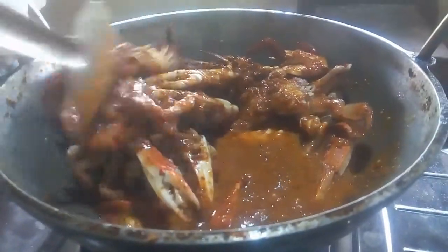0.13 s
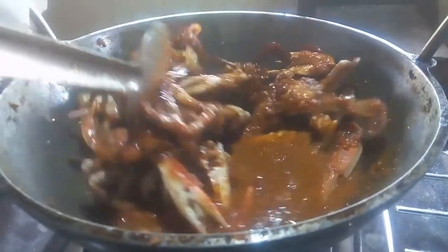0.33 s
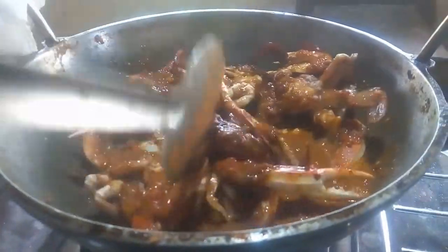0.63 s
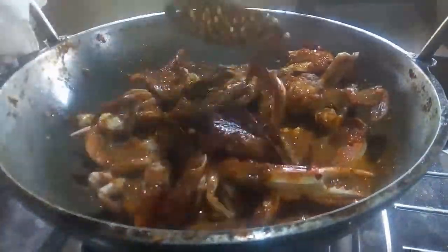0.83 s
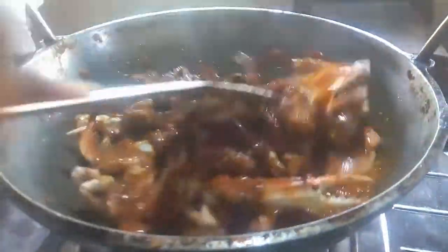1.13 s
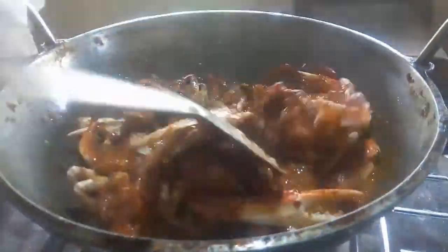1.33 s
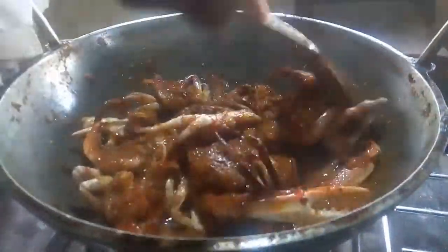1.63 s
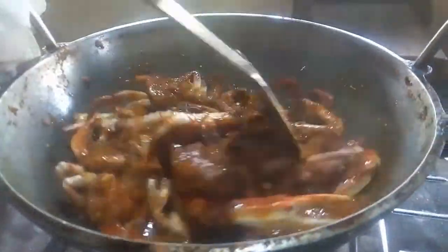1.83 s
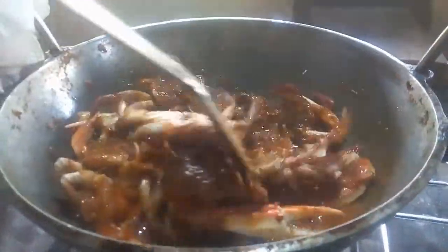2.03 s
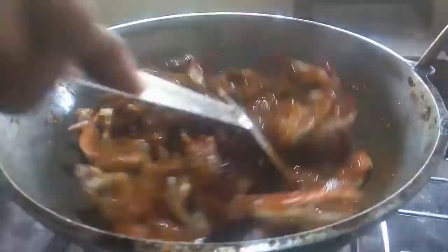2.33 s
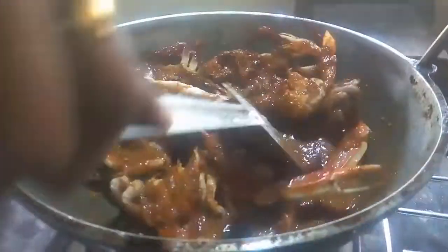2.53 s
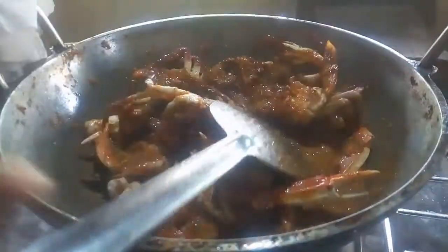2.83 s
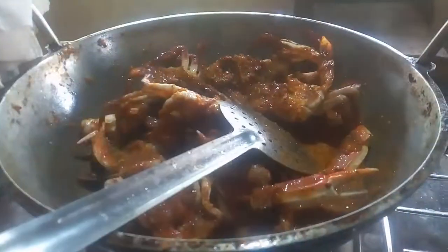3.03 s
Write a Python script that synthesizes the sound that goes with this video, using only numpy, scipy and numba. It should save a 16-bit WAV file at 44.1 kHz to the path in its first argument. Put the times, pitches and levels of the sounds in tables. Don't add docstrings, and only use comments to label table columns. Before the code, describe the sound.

A metal skimmer stirs crab in thick gravy, close up in a small kitchen. Gritty scrapes, sharp shell ticks and squelches crowd 0-0.8 s, with a bright clink near 0.26. Wet strokes and clicks continue from 1.0 to 2.1, with knocks near 1.7 and 1.9. A firm scrape and wet thud land around 2.3, then it quietens until the handle clatters on the rim at 2.92, bounces rapidly and rings.

```python
import sys
import numpy as np
from scipy import signal
from scipy.fft import rfft, irfft
from scipy.io import wavfile
from scipy.ndimage import uniform_filter1d
from numba import njit

SR = 44100
rng = np.random.default_rng(int(sys.argv[2]) if len(sys.argv) > 2 else 0)


def master_out(mix):
    frames = np.transpose(np.atleast_2d(mix))
    ceiling = np.clip(frames, -1, 1)
    pcm = np.round(ceiling * 32767).astype(np.int16)
    wavfile.write(sys.argv[1], SR, pcm)


def invert_db(x):
    u = np.asarray(x, float) / 20
    return 10 ** u


N = 141120

# (level [dB], time to fade by 60 dB [s])
SKIMMER = [(-5.5, 0.22), (0.5, 0.19), (-8, 0.25), (-8, 0.18), (-1, 0.14), (2, 0.14), (5.5, 0.086),
           (6, 0.11), (2.5, 0.17), (7, 0.26), (4, 0.36), (8, 0.11), (-1.5, 0.05), (13.5, 0.098)]
# (level [dB], time to fade by 60 dB [s])
PAN = [(-9, 0.31), (-10, 0.34), (-0.5, 0.22), (-4, .22), (5.5, 0.057), (-25, .2), (8.5, 0.055),
       (13.5, 0.083), (11, 0.089), (11.5, 0.12), (15.5, 0.051), (-1.5, 0.076), (-8, .2), (-9, 0.074)]


def colour(table, hz):
    points = np.array(table, float)
    return np.interp(np.log(np.maximum(hz, 1)), np.log(points[:, 0]), points[:, 1])


def walk(rate):
    hold = int(SR / rate)
    steps = np.repeat(rng.standard_normal(N // hold + 1), hold)
    level = uniform_filter1d(steps, hold)[:N]
    return level / level.std()


@njit
def add(out, start, n, pole, glide, rise, left, right):
    for k in range(len(start)):
        z, p, unrisen = 1. + 0j, pole[k], 1.
        for i in range(start[k], min(start[k] + n[k], out.shape[1])):
            unrisen *= rise[k]
            out[0, i] += (1 - unrisen) * (z * left[k]).imag
            out[1, i] += (1 - unrisen) * (z * right[k]).imag
            z *= p
            p *= glide[k]


def rings(s, hz, db, t60, luck, glide=0., stop_s=9.):
    # (pitch [Hz], level [dB])
    right_port = [(200, 0), (600, -.5), (1400, -4.5), (2800, -5.5), (5500, -2), (9000, -9), (16000, -7)]
    alike_below_hz, rise_cycles = 3000, .6
    t60 = np.maximum(t60, 1e-4)
    s, hz, db, t60, luck, stop_s = (a.ravel() for a in np.broadcast_arrays(s, hz, db, t60, luck, stop_s))
    out = np.zeros((2, N))
    n = np.minimum(t60, np.maximum(stop_s - s, 0)) * SR
    apart = hz / (hz + alike_below_hz)
    right = invert_db(db + colour(right_port, hz)) * np.exp(1j * luck * apart)
    turn = 2 * np.pi * np.minimum(hz, .45 * SR) / SR
    pole = np.exp(1j * turn - np.log(1000) / (t60 * SR))
    bend = np.exp(1j * turn * glide / (t60 * SR))
    rise = np.exp(-hz / SR / rise_cycles)
    add(out, (s * SR).astype(np.int64), n.astype(np.int64), pole, bend, rise, invert_db(db) + 0j, right)
    return out


def crack(s, db, hz, spread, cycles, count=24):
    c = rng.standard_normal((len(s), count, 4))
    pitch = hz[:, None] * np.exp(spread * c[..., 0])
    late = 0.001 * c[..., 1] ** 2
    level = db[:, None] - 12 + 3 * c[..., 2] - 2500 * late
    return rings(s[:, None] + late, pitch, level, cycles / pitch, c[..., 3])


def steel(count):
    skimmer_hz = [3171, 3297, 3667, 4096, 4121, 5119, 5228, 5580, 6228, 6372, 6436, 6702, 6883, 7149]
    pan_hz = [495, 1297, 1852, 2530, 3410, 4307, 7020, 8452, 9006, 10420, 11430, 12860, 15170, 1130]
    # (level [dB], time to fade by 60 dB [s])
    blade = [(-8, .12), (-7, .13), (-16, .25), (-10, .22), (-4, .13), (-5, .14), (3, .1), (0, .11),
             (-4, .12), (0, .17), (-6, .15), (-10, .08), (-6, .07), (-6, .08)]
    blade_hz = [2164, 4441, 4743, 5055, 5735, 7736, 9351, 9625, 10950, 12200, 13460, 14100, 14700, 15500]
    # (pitch [Hz], level [dB])
    weak_colour = [(200, 2), (500, -10.5), (1400, -1.5), (3300, 6), (5000, -4), (6900, 0), (9000, 12),
                   (16000, -25.5)]
    place = np.arange(count) / count + rng.random(count) / count
    hz = 12000 * place ** 1.4 + 300
    weak_t60 = 0.054 * invert_db(3.0 * rng.standard_normal(count))
    weak = np.c_[hz, colour(weak_colour, hz) - 5.5, weak_t60]
    strong = np.r_[np.c_[skimmer_hz, SKIMMER], np.c_[pan_hz, PAN], np.c_[blade_hz, blade]]
    modes = np.r_[strong, weak]
    return np.c_[modes, rng.standard_normal(len(modes))].T


def effort(s):
    # (start [s], peak [s], end [s], pressure level [dB], gravy level [dB])
    strokes = [(-.05, 0.054, 0.79, -48.5, -51), (0.205, 0.28, 0.31, -42, -40),
               (0.405, 0.56, 0.64, -43, -38), (0.694, 0.77, 0.81, -55.5, -52),
               (1.046, 1.14, 1.254, -47, -35), (1.199, 1.346, 1.156, -46, -37.5),
               (1.55, 1.584, 1.7, -77, -65), (2.486, 2.607, 2.754, -54, -51.5),
               (1.704, 1.87, 1.995, -45, -31.5), (1.982, 2.028, 2.08, -47, -41.5),
               (2.249, 2.34, 2.435, -39.5, -73), (2.324, 2.45, 2.574, -50, -36),
               (2.894, 2.913, 8, -61, -39)]
    start, peak, end, press_db, flow_db = np.array(strokes).T[:, :, None]
    before = (peak - s) / np.maximum(peak - start, .01)
    after = (s - peak) / np.maximum(end - peak, .01)
    off = np.maximum(before, after)
    shape = invert_db(2 * -10 * off ** 2.0)
    return [10 * np.log10((shape * invert_db(2 * db)).sum(axis=0) + 1e-12) for db in (press_db, flow_db)]


def stirring(hz, db, t60, phase, count=30000):
    # (pitch [Hz], level [dB])
    grit_colour = [(300, -6), (1000, 4), (2000, 9), (3500, 11), (5000, 10), (6500, 12), (9000, 12),
                   (16000, 4)]
    s, u = rng.random(count) * N / SR, rng.random(count)
    c = rng.standard_normal((3, count))
    press, flow = effort(s)
    chatter_db = 1.5 * walk(70)[(s * SR).astype(int)]
    size = 2 * np.minimum(rng.exponential(size=count), 5) + chatter_db
    patch_db = 2. * walk(25.76)[(s * SR + u // .12 * 9000).astype(int) % N]

    pitch = 300 + 15000 * u ** 1.317
    scrape_db = press + size + patch_db + colour(grit_colour, pitch) - 11.5
    grit = rings(s, pitch, scrape_db, 11.6 / pitch, 5.9 * c[0])

    few = slice(count // 20)
    k = rng.integers(0, len(SKIMMER) + len(PAN), count // 20)
    sing = rings(s[few], hz[k], press[few] + size[few] + db[k] - 29, t60[k] * .3, phase[k])

    bubble_hz = 400 * np.exp(0.528 * c[1, few])
    wet_db = flow[few] + size[few] - 12
    squelch = rings(s[few], bubble_hz, wet_db, 7.7 / bubble_hz, 0.51 * c[2, few], glide=0.19)
    return grit + sing + squelch


def ticks(hz, db, t60, phase):
    # (time [s], peak level [dB], click pitch [Hz])
    tick_list = [(0.0214, -38.5, 2380), (0.0518, -40, 2760), (0.0684, -33.5, 3330), (0.1151, -28.5, 3660),
                 (0.1888, -37, 2040), (0.2074, -39, 3000), (0.251, -28, 2550), (0.2593, -24.5, 5270),
                 (0.4303, -48, 3660), (0.4994, -38, 3500), (0.5384, -31.5, 3780), (0.5524, -32, 4100),
                 (0.7258, -34.5, 3120), (0.7594, -38, 5540), (1.0006, -29.5, 6200), (1.0074, -31, 3340),
                 (1.0254, -37.5, 6130), (1.1727, -43, 3300), (1.2329, -38.5, 2850), (1.2424, -34.5, 2950),
                 (1.2735, -45, 2960), (1.2866, -38, 2080), (1.3005, -31, 2680), (1.3299, -34.5, 5500),
                 (1.3444, -34.5, 5600), (1.373, -33, 2750), (1.4116, -36.5, 2500), (1.512, -39.5, 3230),
                 (1.5224, -42, 3270), (1.6298, -29, 3460), (1.705, -22.5, 1966), (1.7943, -32.5, 1820),
                 (1.849, -36, 4400), (1.8744, -36, 2700), (1.9001, -24, 3470), (2.0084, -34.5, 4160),
                 (2.0282, -34, 3870), (2.0469, -33.5, 2680), (2.0688, -24.5, 3380), (2.2293, -41, 6300),
                 (2.2484, -37, 3340), (2.2579, -34, 2580), (2.2744, -30, 2600), (2.2834, -32.5, 5500),
                 (2.299, -32.5, 5000), (2.3044, -33, 3320), (2.3204, -32.5, 5300), (2.392, -37, 2940),
                 (2.4478, -35.5, 1950), (2.577, -50, 4100), (2.611, -39, 4000), (2.7485, -39, 3450)]
    # (time [s], pitch [Hz], level [dB], time to fade by 60 dB [s])
    ping_list = [(0.061, 3320, -42, 0.42), (0.051, 2650, -37, .06), (.115, 3430, -38, 0.11),
                 (0.569, 1290, -51.5, 0.53), (.57, 1838, -47, 0.39), (1.0, 6050, -45, 0.11),
                 (1.091, 3480, -48, .15), (1.577, 3890, -53, 0.41), (2.286, 1250, -44.5, .1),
                 (2.307, 1154, -37, .1), (2.75, 3350, -49, 0.046), (2.748, 2120, -42, .04),
                 (2.9, 3270, -53, 0.22), (2.898, 6400, -71, 0.073), (0.26, 5420, -17.5, 0.0099),
                 (0.26, 4136, -42, 0.23), (0.754, 5460, -47.5, 0.15), (0.998, 1295, -19, 0.0073),
                 (1.007, 3440, -34.5, 0.062), (1.630, 3410, -36, 0.25), (1.630, 4862, -42.5, 0.25),
                 (1.706, 1817, -35, .24), (1.706, 2307, -39, .14), (1.630, 2450, -27, .016),
                 (1.900, 2400, -30, .02), (1.901, 3500, -36.5, 0.046), (2.070, 6320, -42, 0.1),
                 (2.240, 1310, -48, 0.2), (2.576, 4130, -50.5, 0.077)]
    s, peak_db, pitch = np.array(tick_list).T
    firm_db = np.clip(peak_db + 35.5, -12, 6)
    click = crack(s, peak_db + 5.5, pitch, spread=0.23, cycles=21.4)
    clack = crack(s, peak_db + firm_db - 9.5, np.full(len(s), 6000.), spread=0.614, cycles=27.0)
    near = -9 * np.log(hz / pitch[:, None]) ** 2
    uneven = 5 * rng.standard_normal((len(s), len(hz)))
    ring_db = (peak_db + firm_db)[:, None] - 28 + db + near + uneven
    ringing = rings(s[:, None], hz, ring_db, t60 * 0.42, phase)
    pings = rings(*np.array(ping_list).T, 0.14 * rng.standard_normal(len(ping_list)))
    return click + clack + ringing + pings


def thuds():
    # (time [s], peak level [dB], pitch
    # [Hz], time to fade by 60 dB [s])
    thud_list = [(0.29, -36, 400, .075), (0.341, -46, 89, .08), (0.498, -30, 400, 0.061),
                 (.657, -29, 810, 0.12), (1.2, -42, 434, .05), (1.249, -60, 89.5, 0.13),
                 (1.517, -34.5, 545, 0.05), (1.665, -42, 706, 0.031), (1.706, -35.5, 497, 0.036),
                 (1.0, -50, 86, 0.072), (1.898, -45, 70, 0.061), (1.795, -22.5, 770, 0.055),
                 (1.829, -36, 164, 0.096), (1.901, -26.5, 500, 0.046), (2.327, -19, 605, 0.036),
                 (2.334, -21.5, 138, 0.07), (2.391, -24, 460, 0.051), (2.93, -31, 99, 0.15),
                 (2.959, -15.5, 297, .08), (2.993, -20, 400, 0.055)]
    s, peak_db, pitch, t60 = np.array(thud_list).T[:, :, None]
    c = rng.standard_normal((len(s), 30, 3))
    late = t60 * rng.random((len(s), 30)) ** 2
    hz = pitch * np.exp(.65 * c[..., 0])
    level = peak_db - 7.5 - 30 * late / t60 + 1.0 * c[..., 1]
    return rings(s + late, hz, level, 6 / hz, 0.7 * c[..., 2], glide=0.3)


def drop(hz, db, t60, phase):
    # (time [s], skimmer level [dB], pan level [dB], share of skimmer fade time [1], favoured pitch [Hz])
    bounces = [
        (2.9225, -17.5, -20.5, 1.42, 3184),
        (2.939, -28, -35, 1.1, 3370),
        (2.9609, -18.5, -23, 0.83, 4160),
        (2.993, -23, -23, 0.36, 10500),
        (3.007, -23.5, -26.5, 0.76, 3250),
    ]
    s, tool_db, pan_db, share, fond = np.array(bounces).T[:, :, None]
    tool = np.arange(len(hz)) < len(SKIMMER)
    stop = np.where(tool, np.r_[s[2:, 0], 9., 9.][:, None], 9.)
    favour = 5 * np.exp(-(np.log(hz / fond) / 0.057) ** 2)
    gain = np.where(tool, tool_db, pan_db) + db + favour
    gain = gain + 3.5 * rng.standard_normal(gain.shape)
    late = .002 * rng.random((len(s), len(hz)))
    luck = .5 * phase + .5 * rng.standard_normal(gain.shape)
    ringing = rings(s + late, hz, gain, t60 * np.where(tool, share, 1), luck, stop_s=stop)
    hit = crack(s[:, 0], pan_db[:, 0] - 17, np.full(len(s), 4500.), spread=1.0, cycles=6.1, count=40)
    return ringing + hit


def room(x):
    t60_s, level_db, dull_hz = .19, -12, 5400
    t = np.arange(SR // 2) / SR
    mid, side = rng.standard_normal((2, len(t))) * invert_db(-60 * t / t60_s) * (t > .003)
    side = signal.sosfilt(signal.butter(2, 450, "high", fs=SR, output="sos"), side)
    band = signal.butter(1, [250., dull_hz], "band", fs=SR, output="sos")
    tail = signal.sosfilt(band, [mid + side, mid - side])
    tail = tail / np.sqrt((tail ** 2).sum(axis=1, keepdims=True))
    return invert_db(level_db) * signal.fftconvolve(x, tail, axes=1)[:, :N]


def kitchen():
    # (pitch [Hz], level per Hz [dB])
    murmur = [(30, 12), (90, 7), (400, -3.5), (1070, -10), (3300, -8), (6500, -13), (8000, -21),
              (16000, -15)]
    hz = np.arange(N // 2 + 1) * SR / N
    mid, side = rfft(rng.standard_normal((2, N))) * invert_db(colour(murmur, hz))
    side = side * hz / (hz + 900)
    x = irfft(np.array([mid + side, mid - side]), N)
    return x / x.std() * invert_db(-58 + 1.5 * walk(3))


def scene():
    right_lag_s = .00022
    modes = steel(count=150)
    thin = signal.butter(2, 380, "high", fs=SR, output="sos")
    metal = signal.sosfilt(thin, drop(*modes) + ticks(*modes))
    near = metal + thuds() + stirring(*modes)
    late = np.interp(np.arange(N) - right_lag_s * SR, np.arange(N), near[1])
    near = np.array([near[0], late])
    return near + room(near) + kitchen()


def low_pass(x):
    return signal.sosfilt(signal.butter(12, 16310, fs=SR, output="sos"), x)


def record(dry):
    # (pitch [Hz], level [dB])
    mic = [(30, -26), (140, -5), (500, -.5), (6900, .5), (7700, -8), (8500, -14), (15400, -17),
           (16300, -70)]
    cepstrum = irfft(np.log(invert_db(colour(mic, np.arange(1025) * SR / 2048))))
    forward = np.r_[1, np.full(1023, 2), 1, np.zeros(1023)]
    response = irfft(np.exp(rfft(cepstrum * forward)))
    limited = .92 * np.tanh(dry / .92)
    mix = signal.fftconvolve(limited, response[None], axes=1)[:, :N]
    return low_pass(mix)


dry = scene()
out = record(dry)
master_out(out)
```